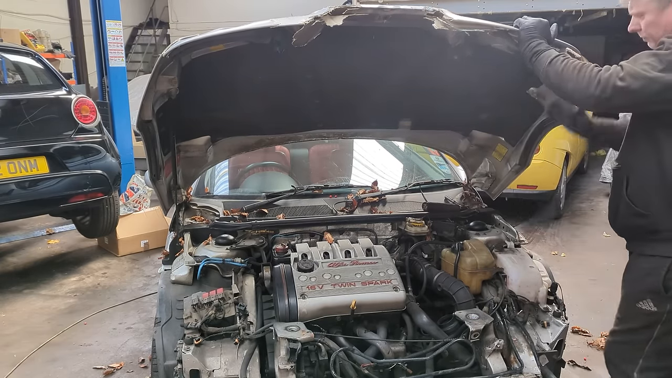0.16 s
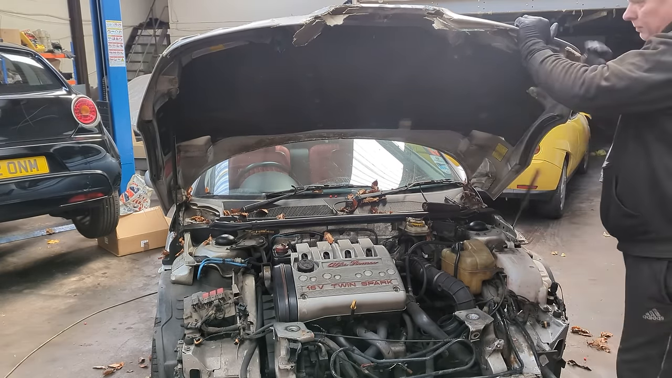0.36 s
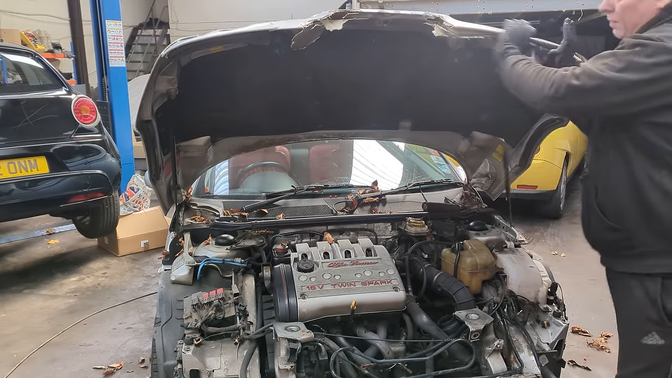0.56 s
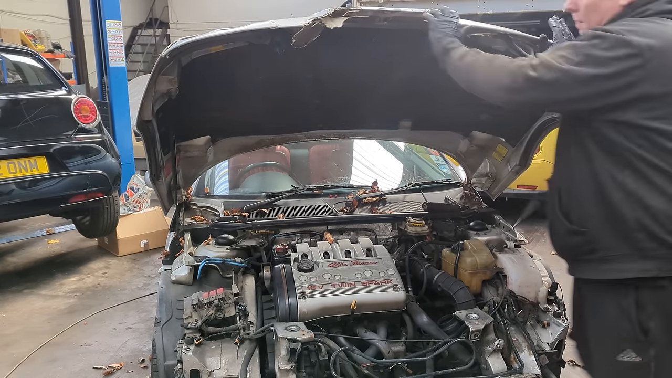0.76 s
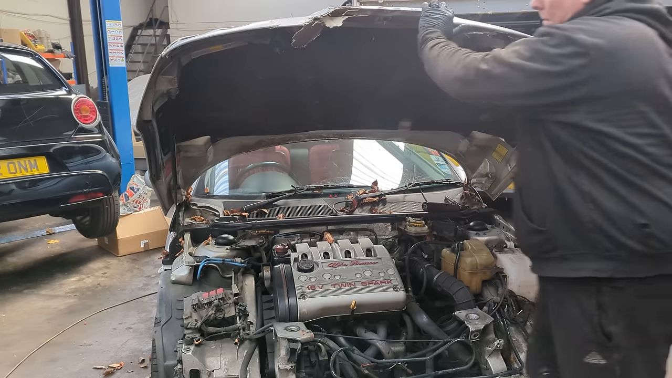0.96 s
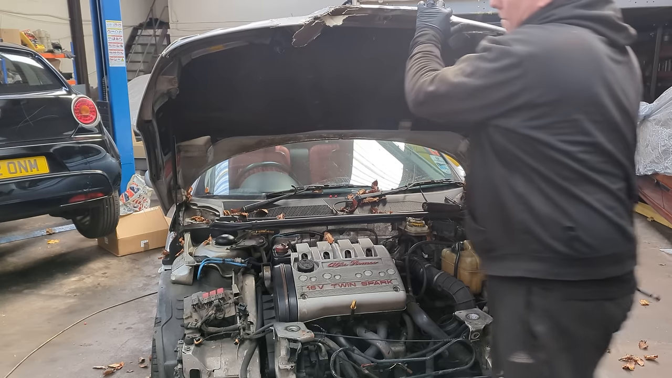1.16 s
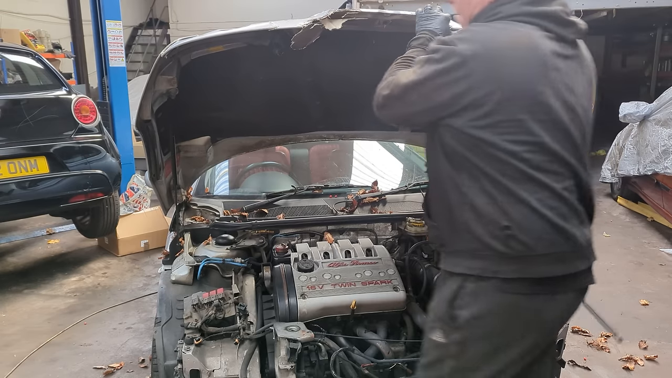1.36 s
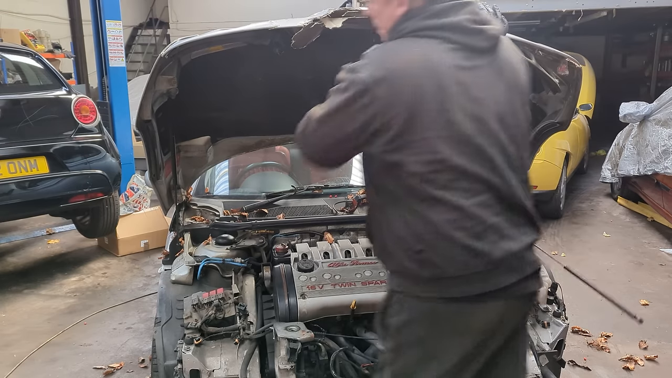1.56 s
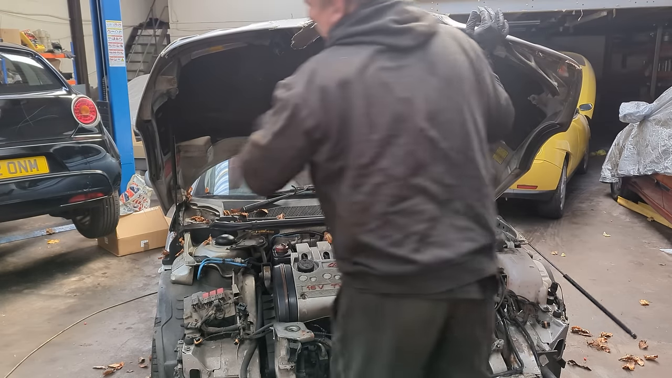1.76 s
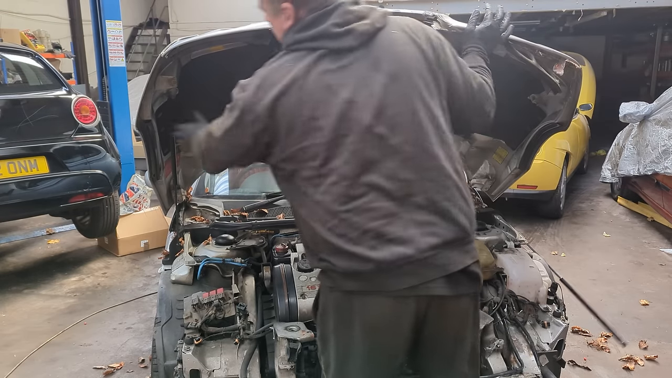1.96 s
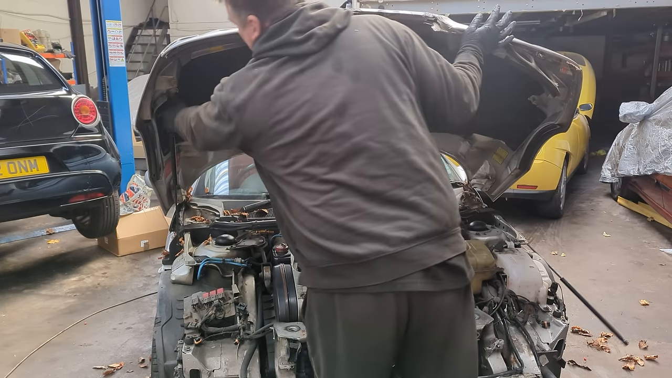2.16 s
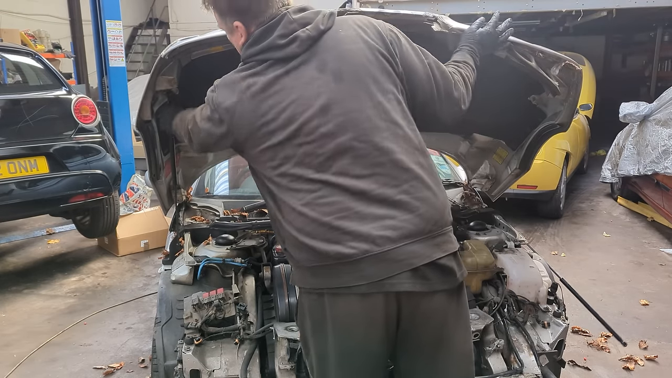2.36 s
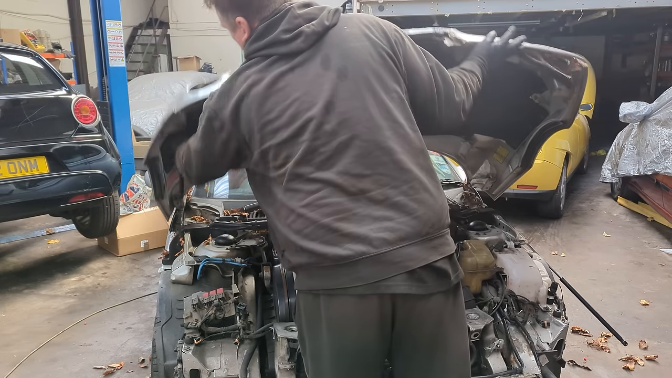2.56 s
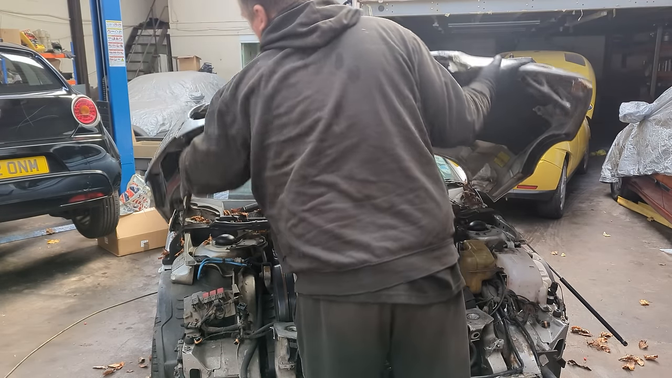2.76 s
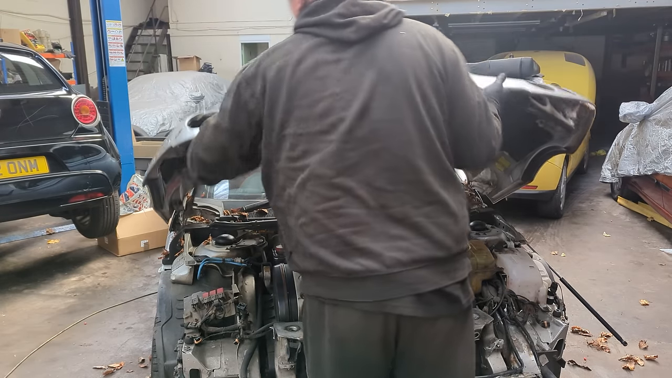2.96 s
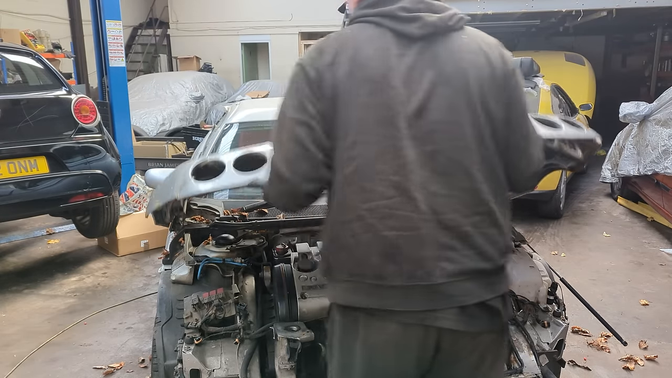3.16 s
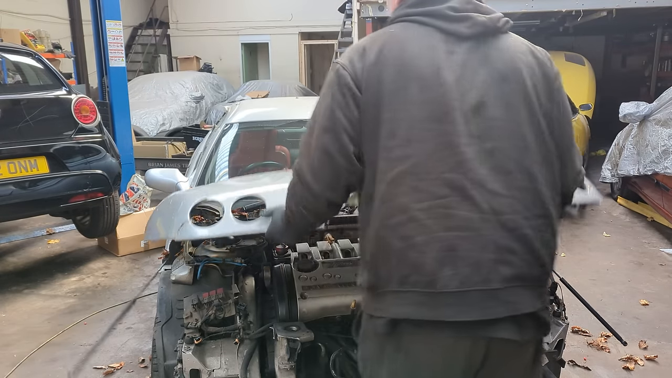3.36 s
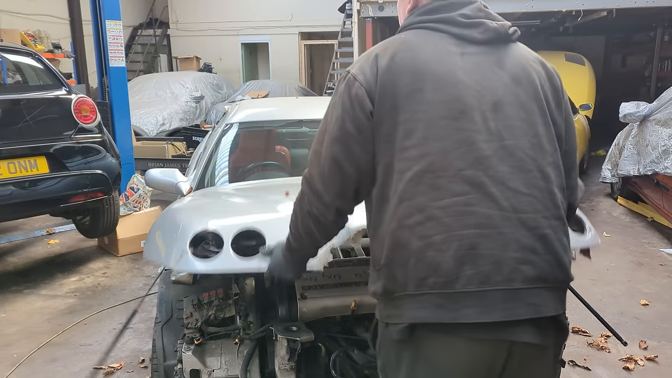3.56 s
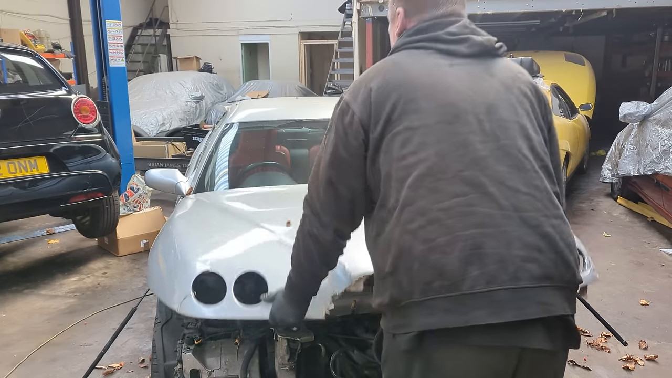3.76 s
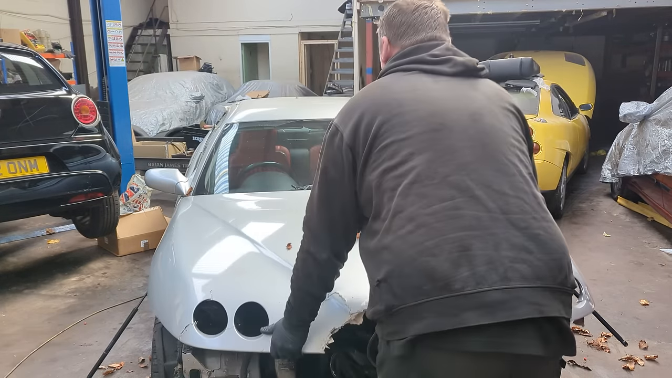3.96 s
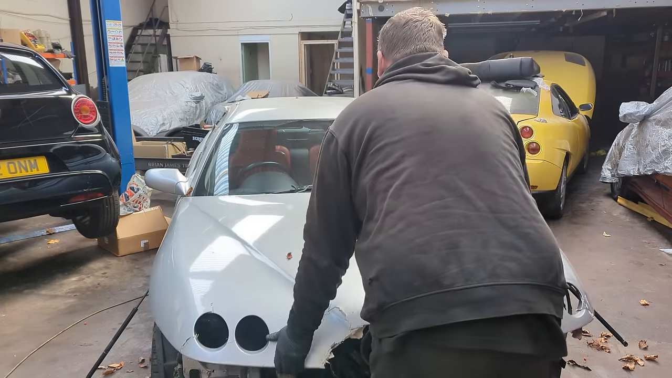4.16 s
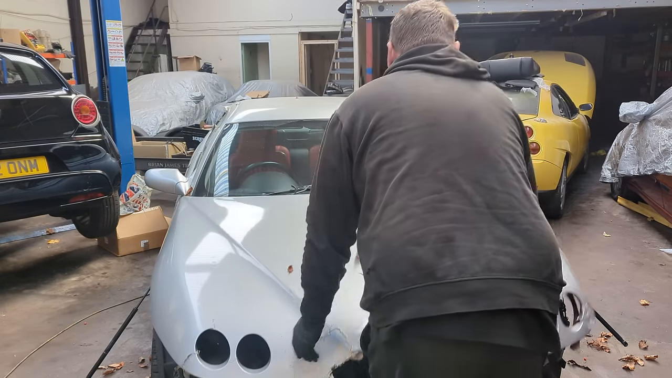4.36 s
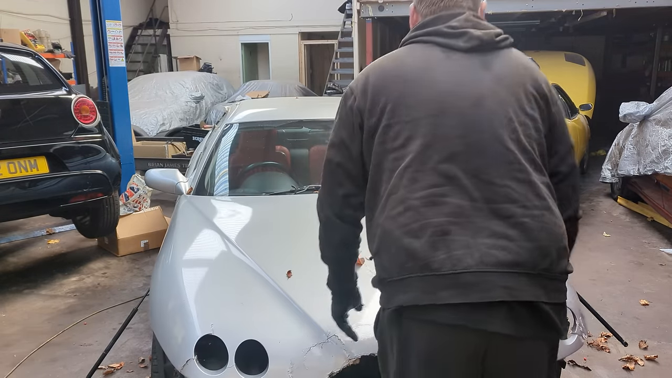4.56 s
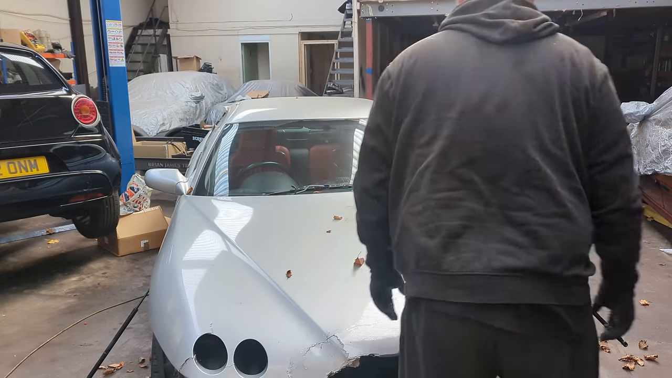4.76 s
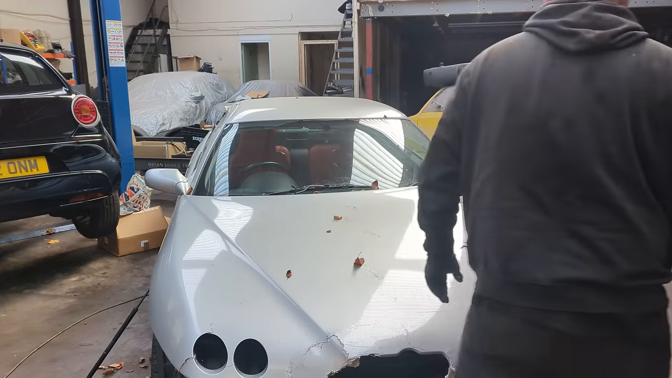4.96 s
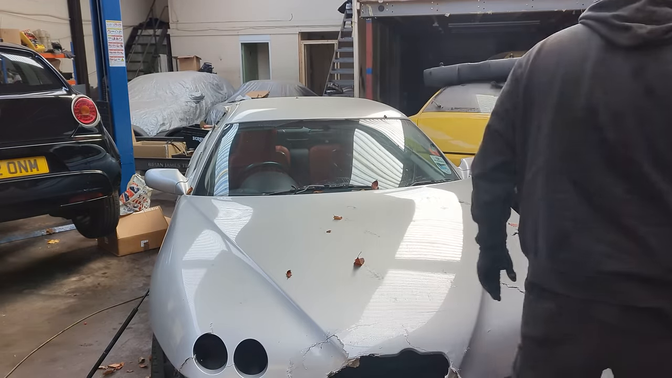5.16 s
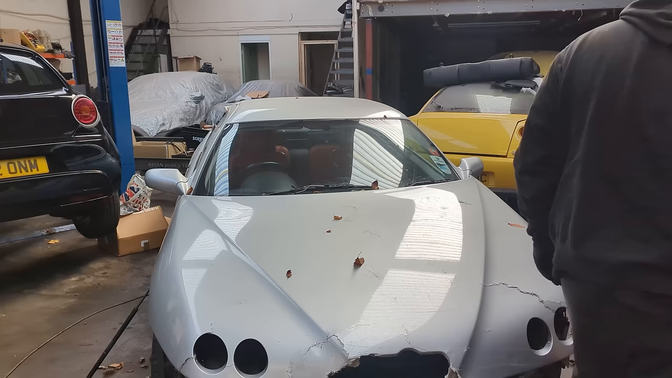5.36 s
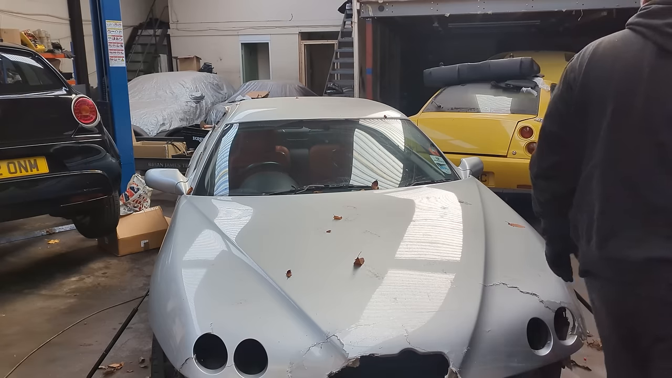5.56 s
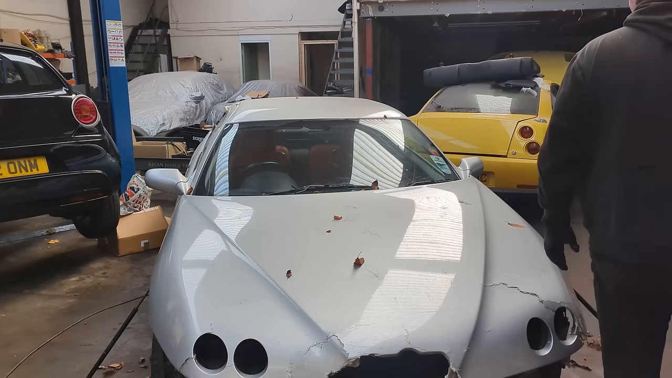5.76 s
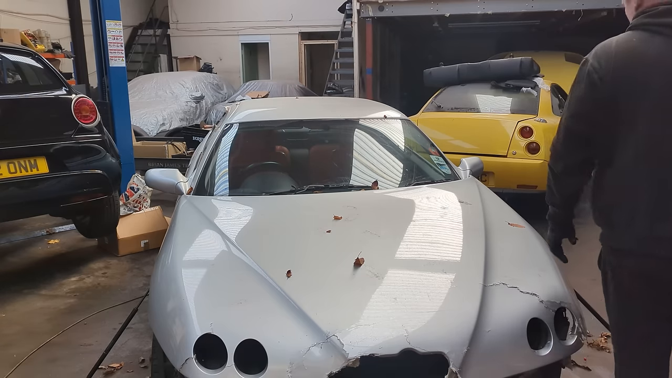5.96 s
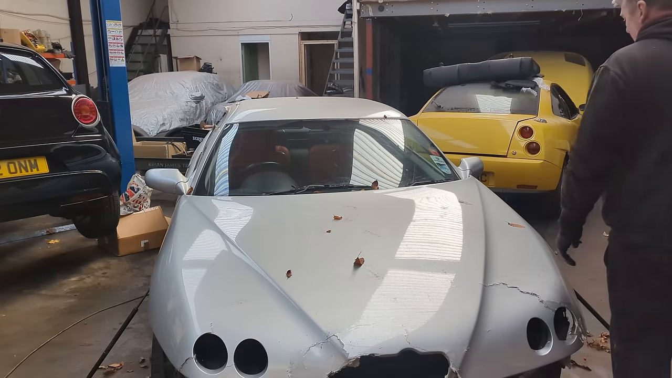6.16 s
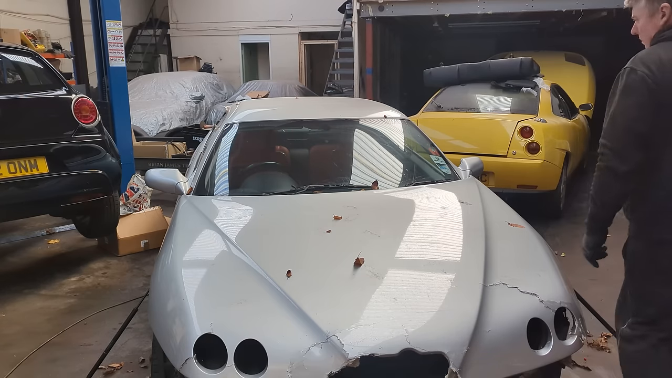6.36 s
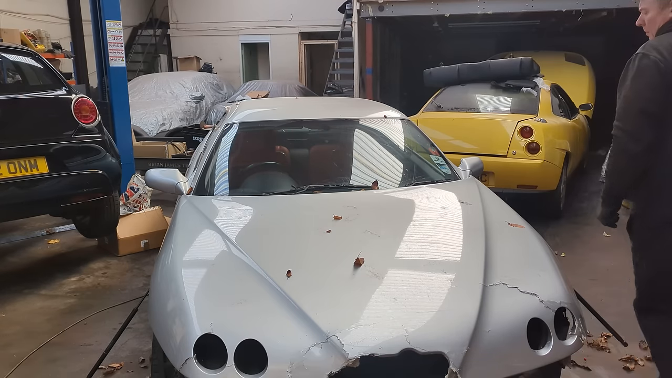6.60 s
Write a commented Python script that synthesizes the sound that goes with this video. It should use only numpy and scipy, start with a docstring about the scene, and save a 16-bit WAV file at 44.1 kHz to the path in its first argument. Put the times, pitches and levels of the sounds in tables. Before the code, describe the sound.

A metal rod clatters on a car's front end, light knocks follow as the steel bonnet comes down, then it slams shut with a rattling thump in an echoing workshop.

```python
"""A mechanic frees the prop rod of a steel car bonnet in a hard-walled workshop; the rod clatters on the front end.
He lowers the bonnet with a few knocks, then it thumps shut; the panel rattles, the catch ticks and whistles faintly.
Clothes and shoes swish throughout and after, over the low rumble of the building.
Steel, rattles, cracks and ticks are decaying modes and noise; swishes, whistles and rumble are shaped noise;
the echo is decaying noise convolved with the sources."""
import sys
import numpy as np
from scipy import signal
from scipy.fft import rfft, irfft, next_fast_len
from scipy.io import wavfile

SR = 44100
rng = np.random.default_rng(int(sys.argv[2]) if len(sys.argv) > 2 else 0)


def put_to_file(sound):
    """Save the sound as 16-bit audio at rate SR, in the file named by the first command-line argument."""
    columns = np.atleast_2d(sound).T  # one column per channel
    safe = np.clip(columns, -1, 1)
    whole_steps = np.round(safe * 32767)
    wavfile.write(sys.argv[1], SR, whole_steps.astype(np.int16))


N = 292365

# stereo width of noise and modes: (frequency [Hz], side minus mid [dB])
WIDTH_DB = [(60, -27), (125, -21), (250, -13.5), (500, -7.5), (1000, 0), (2000, 0), (4000, 0.5)]
TOP_HZ = 15800  # band limit of the recorder
SAG_SHARE, SAG_S = 0.02446, 0.0833  # steel starts sharp by this share, settles with this time constant


def amp(db):
    """Decibels to gain."""
    return 10 ** (np.asarray(db) / 20)


def unit(x):
    """Scale to rms 1."""
    return x / np.sqrt(np.mean(x ** 2) + 1e-20)


def along(points, hz):
    """Interpolate (Hz, value) points on a log-frequency axis."""
    point_hz, values = np.transpose(points)
    return np.interp(np.log(hz + 1), np.log(point_hz + 1), values)


def filtered(x, response):
    """Multiply the spectrum of x by a function of frequency."""
    n = x.shape[-1]
    fft_n = next_fast_len(n + 4096)
    spectrum = rfft(x, fft_n) * response(np.fft.rfftfreq(fft_n, 1 / SR))
    return irfft(spectrum, fft_n)[..., :n]


def noise(size, response):
    """Coloured stereo noise of rms 1; long waves reach both microphones alike, so the bass has little side."""
    def mid_side_response(hz):
        gains = amp(np.outer([0, 1], along(WIDTH_DB, hz)))
        return response(hz) * gains / np.hypot(*gains)

    mid, side = filtered(rng.standard_normal((2, size)), mid_side_response)
    return unit(np.array([mid + side, mid - side]))


def bell(hz, centre_hz, octaves):
    """Gaussian hump on a log-frequency axis."""
    return np.exp(-.5 * (np.log2((hz + 1) / centre_hz) / octaves) ** 2)


def add(track, start_s, sound):
    """Mix a sound into the track; a start before 0 is moved to 0."""
    start = max(round(start_s * SR), 0)
    part = track[:, start:][:, :sound.shape[-1]]
    part += sound[..., :part.shape[-1]]


def fade(t, t60):
    """Exponential decay by 60 dB in t60."""
    return np.exp(-np.log(1000) * t / t60)


def ring(modes, t, strength, swell_cycles, scatter_db, sag_share=0):
    """Struck modes swell over some cycles, sag in pitch and reach the two microphones with a phase gap each."""
    out = np.zeros((2, len(t)))
    for hz, db, t60 in modes:
        life = t[t < t60]
        gap = np.arctan(amp(along(WIDTH_DB, hz))) * rng.standard_normal()
        warped_s = life - sag_share * SAG_S * np.exp(-life / SAG_S)
        phase = 2 * np.pi * (hz * warped_s + rng.random())
        wave = np.sin(np.float32([phase + gap, phase - gap]))
        level = strength(hz) * amp(db + scatter_db * rng.standard_normal())
        swell = 1 - np.exp(-life * hz / swell_cycles)
        add(out, 0, level * fade(life, t60) * swell * wave)
    return out


def touches():
    """Every blow is a bright contact, then a boomier rebound of the flexing skin, each with its own force and note."""
    # blows on the bonnet: (time [s], strength [dB], thud of the whole bonnet [dB], hardness [dB/octave of treble],
    #   rebound [dB], note of struck spot [Hz], its level [dB], note of flexing skin on rebound [Hz],
    #   its level [dB], t60 of both notes [s])
    blows = [(0.222, -22.5, -28, 0, -9, 415.3, -1, 120.5, 11.5, 0.19),
             (0.687, -42.5, -4.5, 0, -7, 380.6, 9.5, 403, 7, 0.18),
             (0.999, -14, -20, -1, -21, 254.5, -1.5, 201, 14, 0.29),
             (1.028, -20, -11.5, 3, 2.5, 179, 3.5, 122, 3.5, 0.17),
             (1.357, -31.5, -8, 1, 0.5, 269, 3, 250, -1, 0.1),
             (1.686, -35, -14, -1.5, -18, 530, 0, 258, 7, 0.11),
             (1.824, -43, -11, 5, -2, 344, 5, 245, 13, 0.089),
             (1.94, -43.5, -4, 1, -2, 325, 3, 407, -1, 0.08),
             (2.07, -41.5, -4, -4.5, -3, 440, -7, 288, 2, 0.059),
             (2.361, -18, -5, -2, -7, 467, 5, 118, 12.5, 0.13),
             (2.426, -31.5, -13, -4, -6.5, 431, 12, 340, 16, 0.13),
             (2.481, -39.5, -4, 0, -3, 497, 15, 335, 16, 0.1),
             (2.651, -35, 1, -19, -5, 475, -5, 120, 0, 0.089),
             (3.074, -32, -18, 1.5, -3, 626, -2.5, 221.6, 9.5, 0.31),
             (3.118, -35, -5, -3, -4.5, 251, 5, 401, -4, 0.37),
             (3.336, -47.5, 5, 3.5, -1.5, 275.6, 6, 306, 12, 0.15),
             (3.419, -32, -11, 0.5, -7, 530, -5, 247, 4, 0.1),
             (3.538, -35, -10, -2, -7.5, 606, 2.5, 238, 15.5, 0.082),
             (3.669, -21.5, -5, -1.5, -21.5, 437.2, 4.5, 169, 16.5, 0.17),
             (4.01, -38.5, -3, -11.5, -2.5, 394.6, 10, 187, 6.5, 0.2),
             (4.3, -36, 4.5, 3.5, -1.5, 186, 11, 170, 0, 0.085),
             (4.337, -21, -7, -3.5, -2.5, 531, 3, 422, -10, 0.13),
             (4.382, -16, 6.5, 2, -8, 346, -3, 131, 13.5, 0.15),
             (4.401, -14.5, 3, -1.7, -10, 481, 5.5, 176, 13, 0.12),
             (4.451, -13.5, -13, -1.5, -4, 459, -1, 147.5, 3, 0.15),
             (4.495, -25, 7, 1, -8, 494.5, 8.5, 281, 8, 0.18),
             (4.537, -17, -3, 0.4, -3.5, 532, 3, 395, 5, 0.16),
             (4.658, -28, 3, 0, -5.5, 502, 3.5, 351, 8, 0.12),
             (4.776, -36.5, 0, 3.5, -24, 500, 8, 403, 8, 0.094)]
    # force spectrum of the first contact: (frequency [Hz], level [dB])
    contact_force = [(65, 3.5), (170, -11), (450, -3), (1000, -2.5), (2600, -12), (9500, -17)]
    # force spectrum of the rebound: (frequency [Hz], level [dB])
    rebound_force = [(65, 0.5), (115, -8), (190, 2), (450, -5.5), (1000, -4), (2600, -9.5), (9500, -27)]
    rebound_delay_s = 0.028
    for s, db, thud_db, hardness, rebound_db, spot_hz, spot_db, flex_hz, flex_db, t60 in blows:
        yield s, db, contact_force, thud_db, hardness, spot_hz, spot_db, t60
        yield s + rebound_delay_s, db + rebound_db, rebound_force, thud_db, hardness, flex_hz, flex_db, t60


def chatter(t, bounce_s, count=5):
    """Loose parts jolted by a blow touch again a few times, later and weaker."""
    since = t - rng.exponential(bounce_s, (count, 1))
    return np.sum((since > 0) * fade(np.abs(since), t60=0.011), axis=0) * fade(t, t60=1.0)


def sheet_steel(crowd_db=-3, modes_db=-4, crowd_swell_cycles=0.66, contact_s=0.0015, lead_s=0.000958,
                crack=0.91, crack_t60=0.005, rattle=0.27, treble_corner_hz=600, length=0.96):
    """Each touch wakes the bonnet's main modes, a crowd of finer ones and the hollow note of the struck spot."""
    # main modes of the bonnet: (frequency [Hz], level [dB], t60 [s])
    panel = [(66.36, -6, 0.9), (71, -13, 0.34), (121.7, 4, 0.4), (131.1, -4, 0.71), (187, -17, 0.5),
             (250.7, -7, 0.62), (327, -35, 0.68), (370, -18, 0.64), (408, -14, 0.16), (499.5, -16, 0.57),
             (621.7, -6.5, 0.49), (754, -10, 0.58), (951, -10.5, 0.7), (1174, -17, 0.47), (1910, -9.5, 0.3),
             (2490, -16, 0.18), (3230, -27, 0.24)]
    # noise bands of the finer modes between them: (frequency [Hz], level [dB], t60 before length [s])
    bands = [(60.4, -5, 0.77), (122, 5.5, 0.27), (224, 3.5, 0.26), (410, 8, 0.18), (820, 4, 0.23),
             (1654, 3.5, 0.13), (2290, -5, 0.37), (3600, -3, 0.3), (6470, 3.5, 0.078), (12900, -2.5, 0.29)]
    # modes of the struck spot: (ratio to its note, level [dB], share of the note's t60)
    spot_modes = [(0.999, 2, 0.86), (1.87, -5.5, 0.43), (2.75, -4.5, 0.27), (4.299, -21.5, 1),
                  (6.2, -28, 0.3)]
    thud_hz, hard_hz = 59.7, 640  # where the bonnet's mass thuds; above where hardness counts
    out, t = np.zeros((2, N)), np.arange(SR) / SR
    short = t[:SR // 2]
    crowds = [noise(3 * SR, lambda f: bell(f, hz, octaves=0.44)) for hz, _, _ in bands]
    for s, db, force, thud_db, hardness, spot_hz, spot_db, spot_t60 in touches():
        touch_s = s - lead_s  # contact begins just before the force peaks

        def strength(hz):
            thud = thud_db * bell(hz, thud_hz, octaves=0.81)
            treble = hardness * np.log2(max(hz / hard_hz, 1))
            return amp(db + along(force, hz) + thud + treble)

        modes = ring(panel, t, strength, swell_cycles=.8, scatter_db=1.5, sag_share=SAG_SHARE)
        add(out, touch_s, amp(modes_db) * modes)

        spot = []
        for ratio, mode_db, share in spot_modes:
            softening_db = min(hardness, 0) * np.log2(max(ratio, 1))
            spot.append((spot_hz * ratio, spot_db + mode_db + softening_db, share * spot_t60))
        add(out, touch_s, ring(spot, short, lambda hz: amp(db), swell_cycles=.8, scatter_db=0, sag_share=SAG_SHARE))

        contacts = crack * fade(short, crack_t60) + rattle * chatter(short, bounce_s=0.073)
        for (hz, band_db, t60), crowd in zip(bands, crowds):
            decay = fade(short, t60 * length) + contacts * hz / (hz + treble_corner_hz)
            # bending waves cross the sheet slowly in the bass, so the thud follows the crack
            rise = 1 - np.exp(-short / (contact_s + crowd_swell_cycles / hz))
            start = rng.integers(crowd.shape[1] - len(short))
            grain = crowd[:, start:start + len(short)]
            add(out, touch_s, amp(crowd_db + band_db) * strength(hz) * rise * decay * grain)
    return out


def cracks_and_ticks(rise_s=0.0012, ring_db=-6):
    """Hard blows crack, light bumps knock and small parts tick, with a thin ring; the walls get one smooth pulse."""
    # cracks, knocks and ticks: (time [s], level [dB], pitch [Hz], its spread [octaves],
    #   t60 of the noise [s], share sent to the room [dB])
    strikes = [(0.222, -24.5, 1400, 0.85, 0.02, 2.5), (0.687, -38.5, 1800, 0.9, 0.02, -4),
               (0.49, -55, 5000, 1.1, 0.03, -15), (0.993, -30, 7000, 1.4, 0.014, 8),
               (1.007, -6, 616, 0.42, 0.027, -27), (1.028, -5, 1190, 0.6, 0.04, -4),
               (1.033, -23, 3650, 0.15, 0.075, -1), (1.048, -32.5, 5500, 0.88, .08, -10),
               (1.071, -14, 900, 0.63, 0.03, -16), (1.101, -15, 690, 0.55, 0.034, -10),
               (1.149, -14, 1100, 0.96, 0.024, -10), (1.193, -20, 900, 0.7, 0.025, -10),
               (1.28, -21, 845, 0.33, 0.023, 0), (1.377, -21, 430, 0.35, 0.031, -17),
               (1.475, -44, 5870, 0.49, 0.017, 11), (1.687, -38, 1300, 0.7, 0.03, -1),
               (2.366, -13.5, 930, 0.46, 0.046, -5), (3.101, -32, 1910, 0.24, 0.025, -5),
               (3.422, -19.5, 633, 0.81, 0.021, -12), (3.54, -23.5, 760, 0.98, 0.02, -17),
               (3.67, -14, 2000, 0.7, 0.018, -20), (3.671, -20.5, 2820, 0.14, 0.028, -4),
               (3.673, -20, 1264, 0.18, 0.034, 1.5), (4.044, -15, 1470, 0.48, 0.0083, -4.5),
               (4.044, -33.5, 4000, 0.64, 0.0099, -9), (4.069, -38, 1900, 0.52, 0.047, -20),
               (4.193, -35, 6850, 0.97, 0.015, -21), (4.255, -44, 7300, 1, 0.015, -12),
               (4.292, -29.5, 4200, 0.83, 0.013, -11.5), (4.337, -20.5, 4500, 1.1, 0.0098, 0),
               (4.384, -2.5, 2640, 0.31, 0.019, -3), (4.402, -18.5, 5000, 0.7, 0.035, -6),
               (4.412, -7, 2100, 0.46, 0.027, -7), (4.451, -16, 560, 0.49, 0.029, -12),
               (4.482, -20.5, 2010, 0.98, 0.042, -3), (4.509, -17, 620, 0.77, 0.028, -17),
               (4.537, -1.5, 550, 0.29, 0.041, -17.5), (4.543, -9, 1150, 0.52, 0.03, -13),
               (4.565, -11, 794, 0.57, 0.029, -1), (4.641, -17, 800, 0.65, 0.018, -18),
               (4.66, -13.5, 560, 0.35, 0.027, -16), (4.692, -15, 750, 0.37, 0.029, -4),
               (4.754, -22.5, 9000, 1.3, 0.025, -10), (4.756, -31, 5220, 0.08, 0.028, 2.5),
               (4.931, -28.5, 9670, 0.52, 0.017, -0.5), (4.953, -17.5, 8850, 0.49, 0.013, -7)]
    # modes of the thin ring: (frequency [Hz], level [dB], t60 [s])
    thin_modes = [(1480, -13, .025), (1940, -14, .035), (2570, -14, .04), (2740, -8, .05), (3190, -13, .04),
                  (3660, -12, .04), (6500, -17, .025), (8080, -14, .04), (8480, -15, .035),
                  (9400, -12, .03), (13500, -13, .03)]
    out, sent, t = np.zeros((2, N)), np.zeros((2, N)), np.arange(SR // 6) / SR
    for s, db, pitch_hz, octaves, noise_t60, room_db in strikes:
        strength = lambda hz: bell(hz, pitch_hz, octaves)
        burst = noise(len(t), strength) * fade(t, noise_t60) * (1 - np.exp(-t / rise_s))
        thin_ring = ring(thin_modes, t, strength, swell_cycles=1, scatter_db=2)
        strike = amp(db) * (burst + amp(ring_db) * thin_ring)
        pulse = filtered(signal.unit_impulse(len(t), SR // 400), strength)  # centred 2.5 ms in
        add(out, s, strike)
        add(sent, s, amp(room_db) * np.std(strike.mean(axis=0)) * unit(pulse))  # scaled to the strike's rms
    return out, sent


def rattles(spread_octaves=0.46, clink_t60=0.018, count=30, clinks_per_s=80):
    """Loose parts clink at random after heavier blows, ever more weakly, with a few short modes per clink."""
    # bursts of clinks: (time [s], level [dB], t60 of the burst [s], pitch [Hz])
    bursts = [(0.235, -30.5, 0.56, 1300), (1.039, -15.5, 0.75, 1500), (3.085, -33, 0.28, 690),
              (3.691, -38, 0.46, 2460), (4.293, -38, .6, 4640), (4.394, -20, 1, 1880),
              (4.399, -27.5, 0.92, 5550)]
    out, t = np.zeros((2, N)), np.arange(SR // 10) / SR
    for s, db, burst_t60, pitch_hz in bursts:
        gaps_s = rng.uniform(.2, 1.8, count) / clinks_per_s
        for delay_s in np.cumsum(gaps_s) - gaps_s[0]:
            pitches_hz = np.minimum(pitch_hz * 2 ** (spread_octaves * rng.standard_normal(size=4)), TOP_HZ)
            level = amp(db + 4 * rng.standard_normal()) * fade(delay_s, burst_t60)
            modes = [(hz, 0, clink_t60) for hz in pitches_hz]
            clink = ring(modes, t, np.ones_like, swell_cycles=0.77, scatter_db=0.5)
            add(out, s + delay_s, level * clink)
    return out


def squeak():
    """The settling catch slips with faint, narrow whistles."""
    # slips: (time of peak [s], frequency [Hz], level [dB], Gaussian half length [s])
    slips = [(4.493, 7970, -40, 0.02), (4.538, 8770, -22.5, 0.0014), (4.907, 11270, -45, 0.019)]
    out, t = np.zeros((2, N)), np.arange(SR) / SR - .5
    for s, hz, db, half_s in slips:
        whistle = noise(SR, lambda f: bell(f, hz, octaves=0.021))
        add(out, s + t[0], amp(db) * np.exp(-.5 * (t / half_s) ** 2) * whistle)
    return out


def swishes(grain_db=2.0, grain_hz=420):
    """Cloth and soles slide in soft strokes of noise, made grainy by catching fibres and grit."""
    # strokes: (time of peak, 0.5 at the earliest [s], Gaussian half length [s], hiss [dB], rub over hiss [dB],
    #   rub pitch [Hz], its spread [octaves])
    strokes = [(0.06, 0.034, -73, -13, 4500, 0.5), (0.506, 0.013, -59.5, 2, 4000, 0.47),
               (0.789, 0.024, -51, -9, 2190, 0.46), (1.523, 0.036, -41, -4.5, 3650, 0.74),
               (1.748, 0.043, -48.5, -16, 2490, 0.83), (1.911, 0.089, -48, -1.5, 1860, 0.71),
               (2.348, 0.006, -50.5, -3, 4000, 0.8), (2.607, 0.063, -54, -4.5, 2550, 0.83),
               (2.925, 0.052, -43.5, 2.5, 2310, 0.42), (3.133, 0.066, -46, -37, 1960, 0.4),
               (3.454, 0.072, -53, 5, 2690, 0.82), (4.339, 0.1, -48.5, -4.5, 2330, 0.39),
               (4.984, 0.08, -46, -5.5, 7200, 0.47), (5.359, 0.018, -53, -1.5, 5500, 0.54),
               (5.444, 0.049, -48.5, -1.5, 3650, 0.72), (5.482, 0.024, -47.5, 4.5, 2720, 0.88),
               (5.58, 0.054, -65, 13.5, 2280, 0.68), (6.234, 0.075, -58, 6.5, 3150, 0.72)]
    # hiss spectrum: (frequency [Hz], relative level per Hz [dB])
    hiss_spectrum = [(1000, 1.5), (2500, -3), (4500, -1.5), (7000, -3.5), (10000, -7), (13000, -1.5),
                     (16000, -17)]
    out, t = np.zeros((2, N)), np.arange(SR) / SR - .5
    for s, half_s, db, rub_db, rub_hz, octaves in strokes:
        rub = noise(SR, lambda hz: bell(hz, rub_hz, octaves))
        hiss = noise(SR, lambda hz: amp(along(hiss_spectrum, hz)))
        add(out, s + t[0], amp(db) * np.exp(-.5 * (t / half_s) ** 2) * (hiss + amp(rub_db) * rub))
    knots = rng.standard_normal(N // 20)
    grain = np.interp(np.arange(N) / SR * grain_hz, np.arange(len(knots)), knots)
    return out * unit(amp(grain_db * grain))


def workshop(x, build_s=0.0021, renew_s=.45):
    """Diffuse echo builds as walls answer, then decays by band; a new random tail fades in at regular steps."""
    # echo: (frequency [Hz], level [dB], t60 [s])
    hall = [(60, -37, 1.9), (197, 1, 0.9), (533, 0.5, 0.89), (950, 2.5, 1.14), (2270, 5.5, 1.13),
            (4700, 4.5, 0.92), (8800, 8.5, 0.55), (15000, -14, 0.63)]
    hall = np.array(hall)
    out, step = np.zeros((2, N)), round(renew_s * SR)
    hz, t, z = signal.stft(noise(SR * 4, np.ones_like), SR, nperseg=256)
    t = t[t < 1.5]  # echo length, s
    t60 = along(hall[:, ::2], hz)[:, None]
    level = amp(along(hall[:, :2], hz))[:, None]
    shape = level * np.sqrt(2 * np.log(1000) / (t60 * SR)) * fade(t, t60)  # energy 1 at 0 dB
    source = x.mean(axis=0)
    for centre in range(0, N + step, step):
        first = rng.integers(z.shape[-1] - len(t))
        tail = signal.istft(z[..., first:first + len(t)] * shape, SR, nperseg=256)[1]
        tail *= 1 - np.exp(-(np.arange(tail.shape[1]) / SR / build_s) ** 2)
        near = np.arange(max(centre - step, 0), min(centre + step, N))
        part = source[near] * np.cos(np.pi / 2 * (near - centre) / step)  # equal-power crossfade
        add(out, near[0] / SR, signal.fftconvolve(part[None], tail, axes=1))
    return out


def building(air_db=-46.5):
    """Steady air noise with a drone that wavers because it is a narrow band of noise."""
    # air spectrum: (frequency [Hz], relative level per Hz [dB])
    air_spectrum = [(24, -9), (40, -2), (64, -1.5), (180, -11.5), (249, -9), (283, -16.5), (491, -12.5),
                    (542, -15), (663, -16), (733, -14.5), (16000, -57)]
    # drone: (frequency [Hz], Gaussian width [Hz], level [dB])
    hum = (54.5, 3.2, -54)
    hum_hz, width_hz, hum_db = hum
    drone = noise(N, lambda hz: np.exp(-.5 * ((hz - hum_hz) / width_hz) ** 2))
    air = noise(N, lambda hz: amp(along(air_spectrum, hz)))
    return amp(air_db) * air + amp(hum_db) * drone


def scene(steel_room_db=-2, rattle_room_db=-7, swish_room_db=-5, swish_right_db=1):
    """Steel, rattles, strikes and swishes feed one room; the mechanic's swishes lean to the right."""
    steel, loose, cloth = sheet_steel(), rattles(), swishes()
    strikes, strikes_sent = cracks_and_ticks()
    sent = amp(steel_room_db) * steel + amp(rattle_room_db) * loose + strikes_sent + amp(swish_room_db) * cloth
    panned_cloth = cloth * amp([[-swish_right_db], [swish_right_db]])
    return steel + loose + strikes + squeak() + panned_cloth + workshop(sent) + building()


def record(dry, low_cut_hz=47):
    """The recorder rounds off the highest peaks, sheds the deepest bass and keeps nothing above its band limit."""
    rounded = dry / (1 + (dry / .97) ** 6) ** (1 / 6)
    return filtered(rounded, lambda hz: (hz < TOP_HZ) * hz ** 4 / np.hypot(hz ** 4, low_cut_hz ** 4))


dry = scene()
out = record(dry)
put_to_file(out)
```